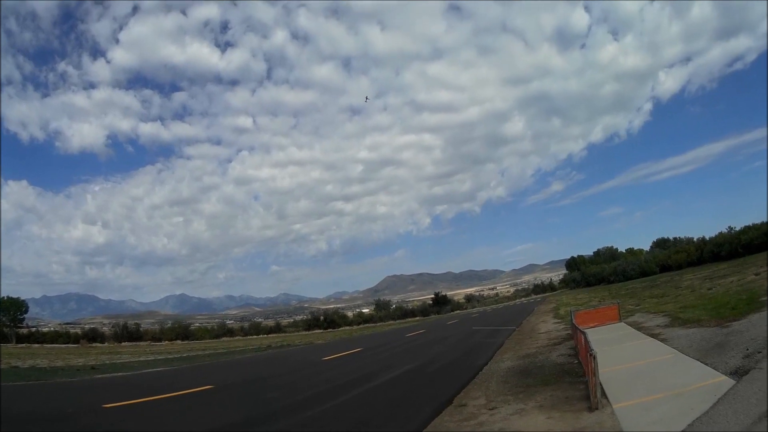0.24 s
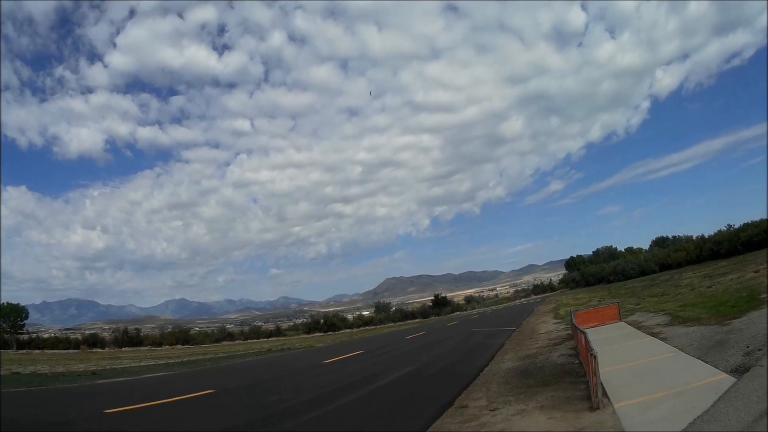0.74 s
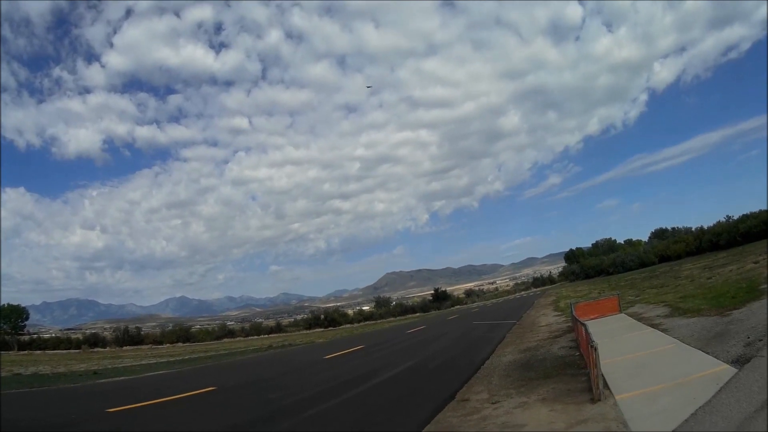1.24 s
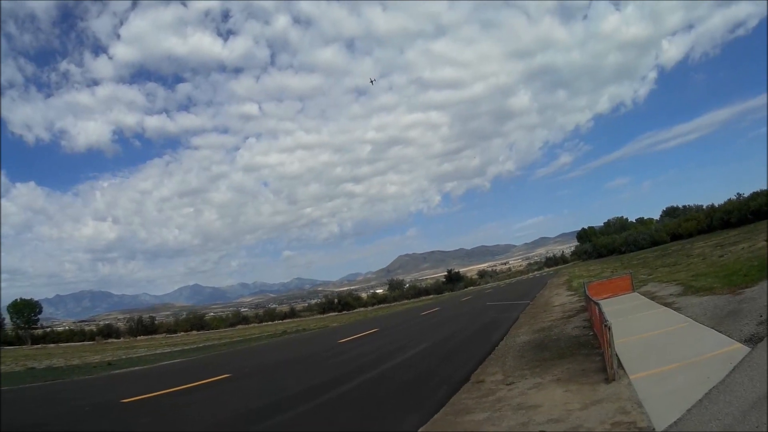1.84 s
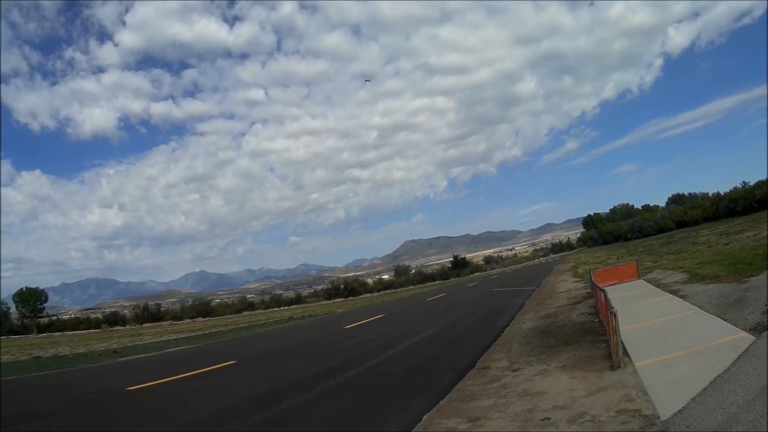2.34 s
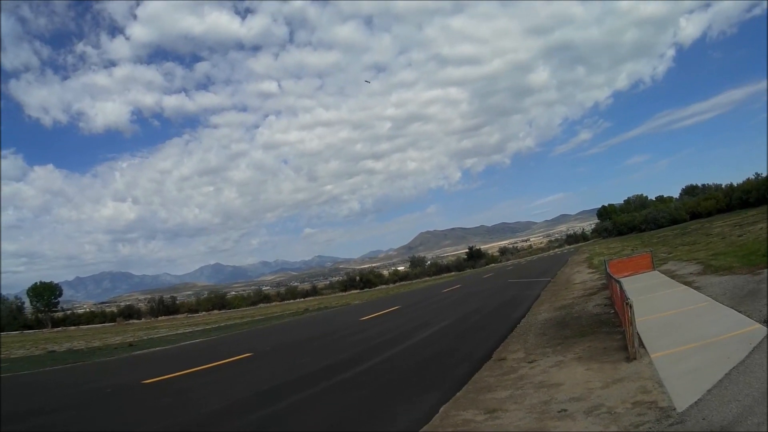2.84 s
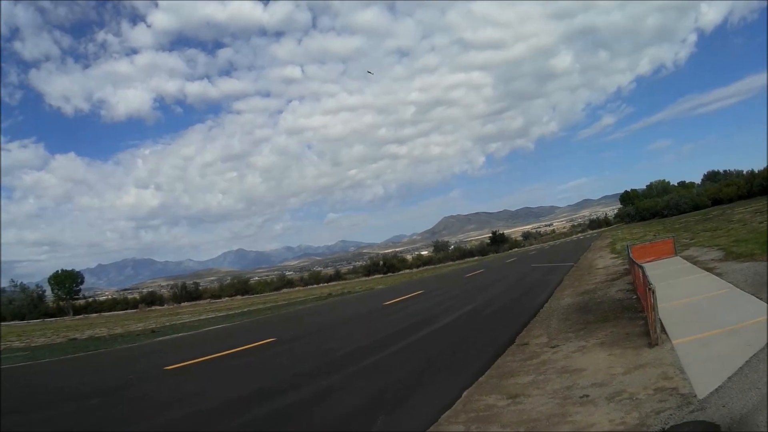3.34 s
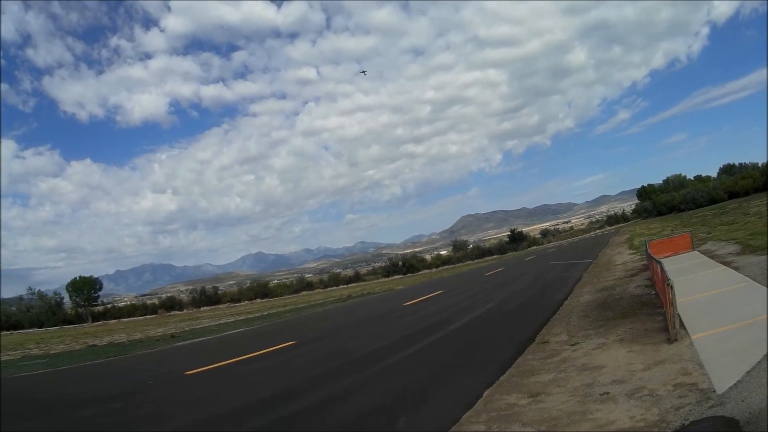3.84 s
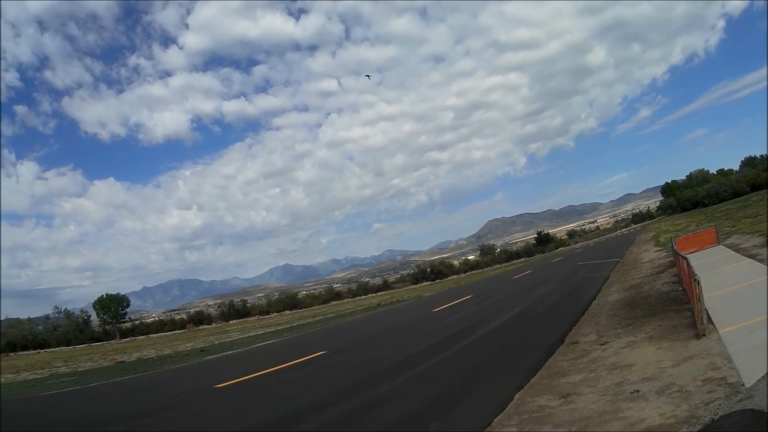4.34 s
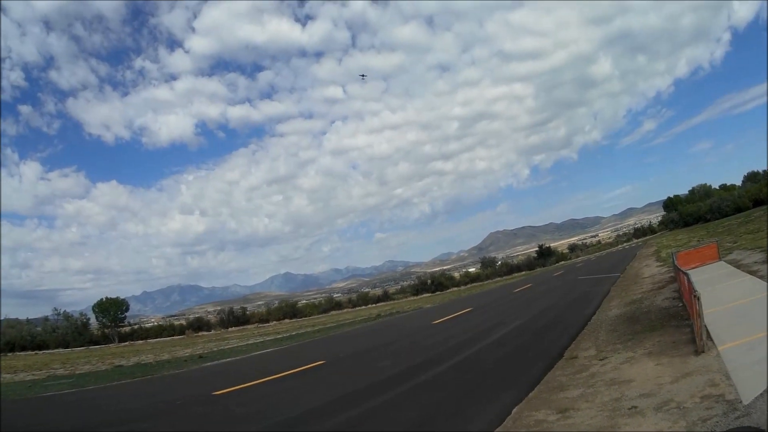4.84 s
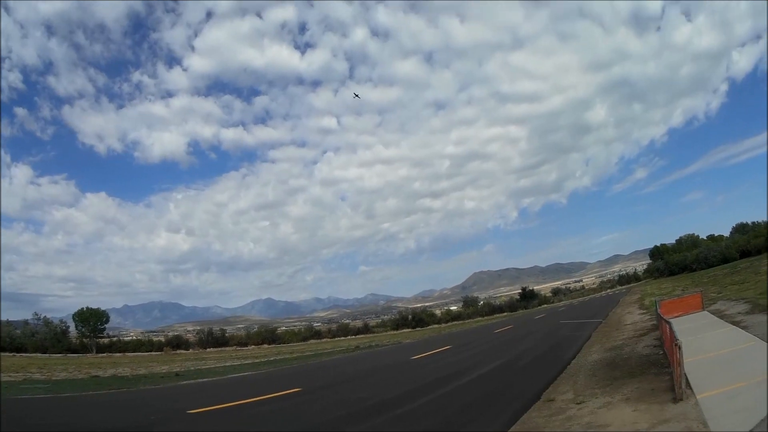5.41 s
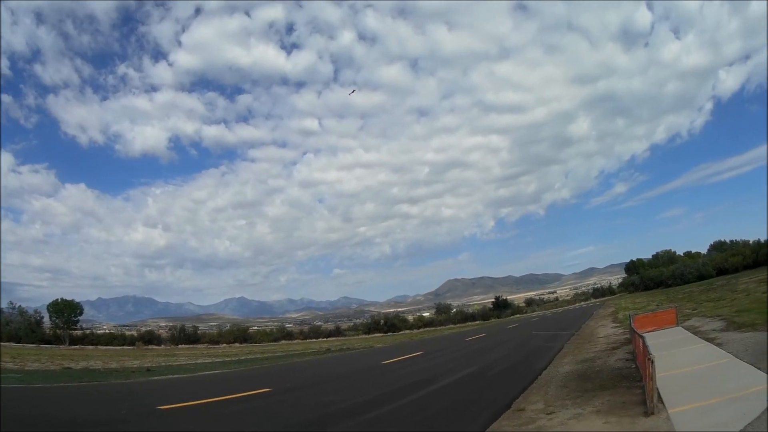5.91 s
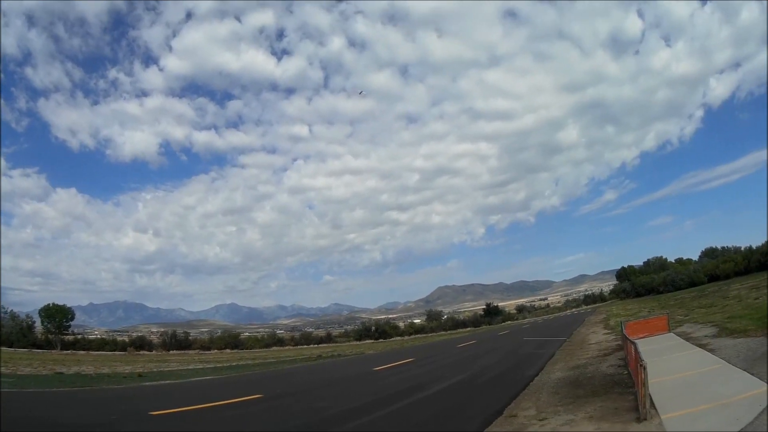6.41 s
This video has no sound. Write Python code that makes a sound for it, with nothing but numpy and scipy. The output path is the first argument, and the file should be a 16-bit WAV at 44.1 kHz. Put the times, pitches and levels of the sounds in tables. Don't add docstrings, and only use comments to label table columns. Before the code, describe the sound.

Harsh, rasping two-stroke engine of a tumbling model aeroplane, high outdoors, flaring and fading constantly, dipping near the end, then revving back up loudly.

```python
import sys
import numpy as np
from scipy import signal
from scipy.fft import rfft, irfft
from scipy.io import wavfile
from scipy.ndimage import uniform_filter1d

SR = 44100
rng = np.random.default_rng(int(sys.argv[2]) if len(sys.argv) > 2 else 0)


def put_to_file(sound):
    columns = np.atleast_2d(sound).T
    safe = np.clip(columns, -1, 1)
    whole_steps = np.round(safe * 32767)
    wavfile.write(sys.argv[1], SR, whole_steps.astype(np.int16))


def elevation(decibels):
    levels = np.asarray(decibels, float)
    return 10 ** (levels / 20)


N = 294147
MEAN_DB = -27


# (t/s, half width/s, gain/dB)
SLAPS = [
    (.58, 0.46, 10),
    (1.3, 0.15, 17.5),
    (2.4, 0.45, -14),
    (4.1, .3, 12),
    (6.05, .2, -21),
    (6.4, 0.11, 21),
]


def bark(turns, level_db):
    swing_db = level_db - MEAN_DB
    blade_db = -15 + sum(gain_db * bump(s, half_s) for s, half_s, gain_db in SLAPS)
    turbulence = np.clip(.62 - .03 * swing_db, .3, 1)
    ring = muffler_ring(turns, blade_db, turbulence)
    body = muffler_body(turns, blade_db, turbulence, swing_db)
    treble = crack_and_sizzle(turns, blade_db, turbulence)
    return elevation(level_db) * (ring + body + treble)


# (t/s, muffler resonance f/Hz, crack level/dB re bark)
MUFFLER_ASPECT = [(0, 1140, -9.5), (.32, 1450, -13.5), (1.1, 1130, -20.5), (1.6, 960, -16),
                  (1.95, 1230, -16.5), (2.26, 1580, -8.5), (2.4, 1170, -12.5), (2.7, 1250, -6),
                  (3.05, 1100, -17), (3.49, 1420, -11), (3.8, 1226, -18.5), (4.68, 1406, -13),
                  (4.82, 1260, -16), (5.5, 1190, -15), (5.62, 1770, -12), (6.04, 980, -8.5),
                  (6.3, 1220, -8.5), (6.4, 1490, -17)]


def muffler_ring(turns, blade_db, turbulence):
    ring_hz, _ = in_time(MUFFLER_ASPECT)
    firing = pulses(turns, blade_db, uneven_db=.6, jitter_us=10, puff=.12 * turbulence)
    smooth = through_air(firing, firing, shade_db=0, scatter_db=-17.5)
    wide = swelling_band(smooth, 892, 2090, order=3)
    ring = gliding(gliding(wide, ring_hz, width_hz=690), ring_hz, width_hz=950)
    return evened(ring + elevation(-8.5) * wide)


# (t/s, half width/s, level/dB, body level/dB)
WING_PASSES = [(.61, 0.071, -1, -5.5), (.92, 0.18, -1, -15), (1.2, 0.12, -2, -3), (1.55, 0.36, -2.5, 7.5),
               (2.28, 0.066, 3, -1), (3.1, 0.063, 2, -9), (4.14, 0.11, -1, -2), (4.33, 0.045, 0, 4),
               (5.94, 0.055, 1, 1), (6.13, 0.056, 0.5, 5), (6.3, 0.14, -5, 6.5), (6.55, 0.49, 1.5, -5)]


def muffler_body(turns, blade_db, turbulence, swing_db):
    follows = 0.88
    body_db = -7 - (1 - follows) * swing_db
    body_db = body_db + sum(db * bump(s, half_s) for s, half_s, _, db in WING_PASSES)
    exhaust = pulses(turns, blade_db - 10, uneven_db=.6, jitter_us=10, puff=.1 * turbulence)
    deep = through_air(exhaust, exhaust, shade_db=2.5, scatter_db=-26)
    body = swelling_band(deep, 652, 969, order=4)
    return elevation(body_db) * later(evened(body), 1.64)


# (t/s, half width/s, sizzle level/dB, crack shift f/Hz)
JET_AIM = [(.38, .12, 7, 599), (.62, .1, 2, -100), (.85, 0.12, -4, -49), (1.4, .15, 0, 249),
           (1.8, 0.23, 0, 9), (2.14, .08, 6, 297), (2.23, 0.046, 5, 8), (2.45, 0.073, -4, -100),
           (3.0, 0.2, 5, 55), (3.17, 0.063, 8, 220), (3.4, 0.12, 9, 150), (3.6, .1, 6, 127),
           (4.1, .25, 6, 417), (4.4, 0.078, 2, 400), (4.62, 0.17, 11, 98), (5.35, .1, -2, 10),
           (5.58, 0.053, 2, 10), (6.22, 0.1, 7, 147), (6.5, 0.15, -6, -150)]
# (f/Hz, width f/Hz, level/dB)
HOUSING_MODES = [(2573, 170, -4.5), (3450, 1200, -19)]
# (f/Hz, width f/Hz, level/dB)
SIZZLE_MODES = [(4646, 257, 6), (5490, 730, -0.5), (7160, 1300, -37), (9600, 990, -31.5)]


def crack_and_sizzle(turns, blade_db, turbulence):
    _, crack_db = in_time(MUFFLER_ASPECT)
    sizzle_db = -26 + 0.81 * (crack_db - crack_db.mean())
    sizzle_db = sizzle_db + sum(db * bump(s, half_s) for s, half_s, db, _ in JET_AIM)
    crack_hz = 2707 + 50 * drift(4.3) + sum(hz * bump(s, half_s) for s, half_s, _, hz in JET_AIM)
    shade_db = -4 - 2.5 * drift(0.57)
    direct = pulses(turns, blade_db, uneven_db=2.2, jitter_us=17, puff=.085 * turbulence)
    grounded = pulses(turns, blade_db, uneven_db=2.2, jitter_us=17, puff=.085 * turbulence)
    sharp = through_air(direct, grounded, shade_db=shade_db, scatter_db=-19)
    bright = band(sharp, 2560, 4290, order=3)
    crack = gliding(bright, crack_hz, width_hz=490)
    crack = crack + resonances(bright, HOUSING_MODES) + elevation(-15.0) * bright
    sizzle = resonances(sharp, SIZZLE_MODES)
    return elevation(crack_db) * evened(crack) + elevation(sizzle_db) * evened(sizzle)


def pulses(turns, blade_db, uneven_db, jitter_us, puff):
    count = int(2 * turns[-1])
    jitter, strength = rng.standard_normal((1400, 2))[:count].T
    at = np.interp(np.arange(count) / 2, turns, np.arange(N)) + jitter * jitter_us * SR / 1e6
    at = np.clip(at, 0, N - 2)
    whole = at.astype(int)
    is_blade = np.arange(count) % 2
    size = -elevation(uneven_db * strength + blade_db[whole] * is_blade)
    clicks = np.zeros(N)
    np.add.at(clicks, whole, size * (1 - at + whole))
    np.add.at(clicks, whole + 1, size * (at - whole))
    fade = np.exp(-1000 / (3.0 * SR))
    eddies = band(rng.standard_normal(N), 1360, 14000, order=1)
    return clicks + puff * eddies * signal.lfilter([1], [1, -fade], clicks)


# (level/dB at mean loudness, share of the loudness swing, ground echo height 0-1)
CRANK_ORDERS = [
    (-61, 0.01, 0),
    (-45, 0.21, 1),
    (-39, 0.19, 0.37),
    (-46, 0.8, .8),
    (-39.5, 0.62, 0.53),
    (-46, 0.36, 0.92),
]
# (t/s, order, half
# width/s, depth/dB)
ORDER_NULLS = [(.42, 2, 0.089, 29), (2.12, 2, 0.079, 17), (3.28, 2, 0.082, 11), (3.59, 2, 0.084, 12),
               (4.0, 2, 0.19, 8), (4.42, 2, .1, 17), (4.78, 2, 0.063, 22), (5.45, 2, .2, 9.5),
               (5.96, 2, 0.088, 17), (6.361, 2, 0.078, 23), (.98, 3, 0.13, 8.5), (2.3, 3, 0.43, 6.5),
               (3.46, 3, 0.13, 10), (4.68, 3, 0.059, 8), (6.451, 3, 0.33, 12.5), (.64, 5, 0.2, 18),
               (1.03, 5, 0.36, 21), (1.749, 5, .35, 9), (3.0, 5, 0.17, 12), (5.26, 5, 0.26, 12),
               (6.55, 5, 0.3, 14), (2.75, 4, .5, -1), (6.2, 4, 0.57, -9)]


def hum(turns, swing_db):
    delay_ms, = in_time(GROUND_ECHO)
    out = 0
    for order, (db, share, echo) in enumerate(CRANK_ORDERS, start=1):
        nulls = [row for row in ORDER_NULLS if round(row[1]) == order]
        null_db = sum(depth_db * bump(s, half_s) for s, _, half_s, depth_db in nulls)
        tone = np.sin(2 * np.pi * order * turns)
        order_db = db + share * swing_db - null_db + 1.37 * drift(46)
        out = out + elevation(order_db) * (tone + echo * later(tone, delay_ms))
    return np.sqrt(2) * out


# (t/s, delay/ms)
GROUND_ECHO = [(0, 3.8), (.8, 4.08), (1.25, 4.2), (1.9, 4.26), (2.6, 3.86), (3.4, 3.62), (3.9, 3.64),
               (4.3, 3.69), (5.7, 4.25), (6.3, 4.4), (6.67, 4.4)]


def through_air(direct, grounded, shade_db, scatter_db):
    delay_ms, = in_time(GROUND_ECHO)
    scattered = 0
    x = elevation(shade_db) * direct + elevation(5.5) * later(grounded, delay_ms)
    scattered = sum(drift(3.37) * later(x, path_ms) for path_ms in (.45, 1.3, 2.4, 3.1, 6.7, 8.3))
    return x + elevation(scatter_db) * scattered


# (f/Hz, level/dB per Hz)
MICROPHONE_FLOOR = [(25, -86), (60, -79), (140, -85), (300, -83), (1000, -68.5), (4000, -106), (8000, -108),
                    (10300, -108.5), (10900, -106), (11500, -109), (14500, -109), (16000, -118)]


def floor():
    floor_hz, floor_db = np.transpose(MICROPHONE_FLOOR)
    hz = np.fft.rfftfreq(N, 1 / SR) + 1
    shape_db = np.interp(np.log(hz), np.log(floor_hz), floor_db)
    return irfft(rfft(rng.standard_normal(N)) * elevation(shape_db), N) * np.sqrt(SR / 2)


def in_time(rows):
    s, *columns = np.transpose(rows)
    return [np.interp(np.arange(N) / SR, s, c) for c in columns]


def bump(s, half_s):
    return np.clip(1 - np.abs(np.arange(N) / SR - s) / half_s, 0, 1)


def drift(rate_hz):
    r = np.exp(-80 * np.pi * rate_hz / SR)
    chance = rng.standard_normal(N // 40 + 2002)
    slow = signal.lfilter([1], [1, -2 * r, r * r], chance)[2000:]
    return np.interp(np.arange(N) / 40, np.arange(len(slow)), slow / slow.std())


def evened(x):
    power = uniform_filter1d(uniform_filter1d(x ** 2, size=3000), size=3000)
    return x / np.sqrt(power + 1e-12)


def later(x, delay_ms):
    return np.interp(np.arange(N) - delay_ms * SR / 1000, np.arange(N), x, left=0)


def band(x, low_hz, high_hz, order=2):
    return signal.sosfilt(signal.butter(order, [low_hz, high_hz], "band", fs=SR, output="sos"), x)


def swelling_band(x, low_hz, high_hz, order):
    return band(x[::-1], low_hz, high_hz, order)[::-1]


def resonance(hz, width_hz):
    r = np.exp(-np.pi * width_hz / SR)
    return (1 - r * r) / 2 * np.array([1, 0, -1]), [1, -2 * r * np.cos(2 * np.pi * hz / SR), r * r]


def gliding(x, centre_hz, width_hz):
    out, state = np.zeros(N), np.zeros(2)
    for i in range(0, N, 256):
        b, a = resonance(centre_hz[i], width_hz)
        out[i:i + 256], state = signal.lfilter(b, a, x[i:i + 256], zi=state)
    return out


def resonances(x, modes):
    out = 0
    for hz, width_hz, db in modes:
        b, a = resonance(hz, width_hz)
        twice = signal.lfilter(b, a, signal.lfilter(b, a, x))
        out = out + elevation(db + 2.2 * drift(2.5)) * twice
    return out


# (t/s, turns per s)
CRANK_SPEED = [(0, 94.2), (.8, 94.2), (1.66, 99.2), (2.08, 98.4), (2.44, 94.1), (2.8, 99.3), (3.12, 101.9),
               (3.38, 100.6), (3.93, 94.3), (4.29, 98.7), (4.7, 99.2), (5.02, 88.3), (5.26, 89.9),
               (5.38, 88), (5.61, 77.6), (5.87, 96.2), (6.04, 101.4), (6.67, 100.7)]
# (t/s, level/dB)
EXHAUST_LOUDNESS = [(0.0, -25), (0.72, -27), (0.85, -22), (1.13, -29), (2.03, -24), (2.21, -28.5),
                    (2.53, -21), (2.77, -31), (3.47, -32), (3.77, -21.5), (4.01, -37), (4.72, -30.5),
                    (4.79, -23.5), (5.11, -34), (5.55, -40), (5.81, -24.5), (6.58, -21.5), (6.67, -27)]


def scene():
    per_s, = in_time(CRANK_SPEED)
    level_db, = in_time(EXHAUST_LOUDNESS)
    level_db = level_db + sum(db * bump(s, half_s) for s, half_s, db, _ in WING_PASSES)
    per_s = uniform_filter1d(per_s, size=4000)
    turns = np.cumsum(per_s * (1 + .0006 * drift(12))) / SR
    return (bark(turns, level_db) + hum(turns, level_db - MEAN_DB) + floor())[None]


# (t/s, length/ms, lost above f/Hz, surviving tone f/Hz)
DROPOUTS = [(.002, 7, 4800, 4300), (.6837, 7, 4200, 2300), (1.0025, 7, 3300, 2800), (1.0454, 8, 3300, 2800),
            (1.4718, 6.5, 2500, 4700), (1.622, 7, 2100, 3200), (2.1548, 6, 4300, 3700),
            (2.1976, 7, 4300, 3700), (2.4752, 7.5, 4000, 3000), (2.5826, 6, 4300, 3000),
            (2.7312, 6, 5600, 4700), (3.3286, 8.5, 5000, 4700), (3.5421, 6, 5000, 4700),
            (4.0115, 7, 2000, 3700), (4.118, 6.5, 3200, 4500), (4.1823, 6.5, 2500, 4200),
            (4.4595, 6.5, 4300, 3700), (4.7151, 5.5, 5600, 4700), (5.398, 8, 2500, 2200),
            (5.8783, 27, 3100, 4800), (5.8783, 27, 20000, 3700), (6.1868, 5.5, 4600, 5800),
            (6.3149, 6, 4300, 3700)]


def treble_dropouts(x):
    padded = np.pad(x, ((0, 0), (2048, 0)))
    out = padded.copy()
    hz, span = np.fft.rfftfreq(4096, 1 / SR), np.arange(-2048, 2048)
    for s, ms, lost_hz, tone_hz in DROPOUTS:
        at = round(s * SR) + span + 2048
        ramp = np.clip((ms / 2 + 6.5 - np.abs(span) * 1000 / SR) / 8.5, 0, 1)
        gate = np.sin(np.pi / 2 * ramp) ** 2
        spectrum = rfft(padded[:, at] * gate)
        near = irfft(spectrum * (np.abs(hz - tone_hz) < 450))
        strength = np.sqrt(3 * np.sum(near ** 2) / np.sum(gate ** 2))
        tone = strength * gate * np.sin(2 * np.pi * tone_hz * span / SR)
        lost = irfft(spectrum * np.clip((hz - lost_hz) / 150, 0, 1))
        out[:, at] += tone - lost
    return out[:, 2048:]


def top_cut(x):
    return signal.sosfilt(signal.butter(12, 15700, fs=SR, output="sos"), x)


def record(dry):
    mix = treble_dropouts(dry)
    return top_cut(mix)


dry = scene()
out = record(dry)
put_to_file(out)
```